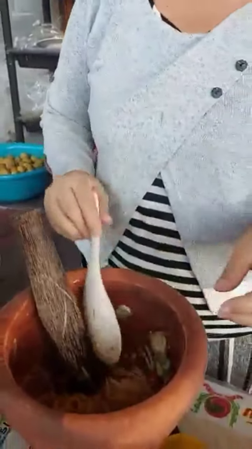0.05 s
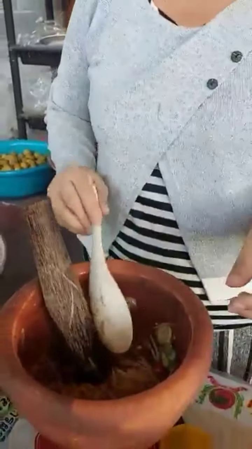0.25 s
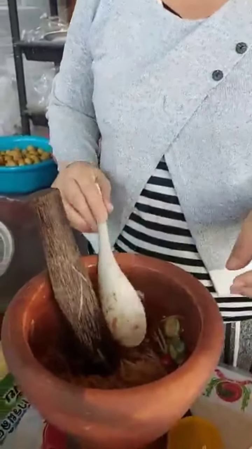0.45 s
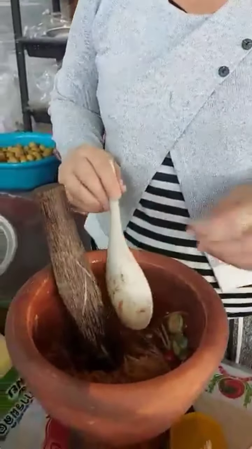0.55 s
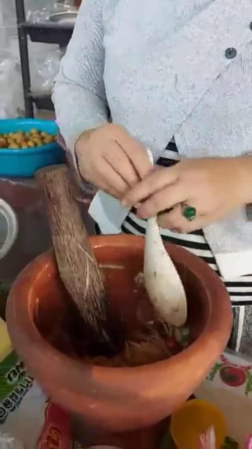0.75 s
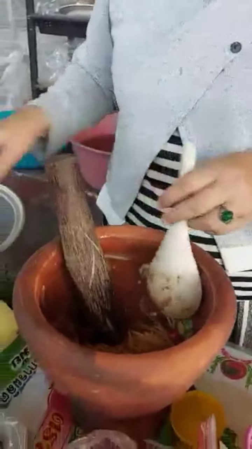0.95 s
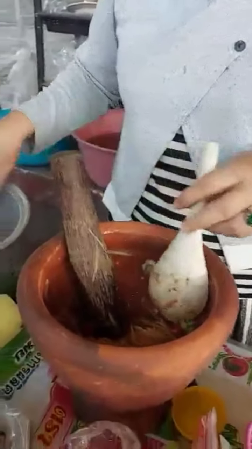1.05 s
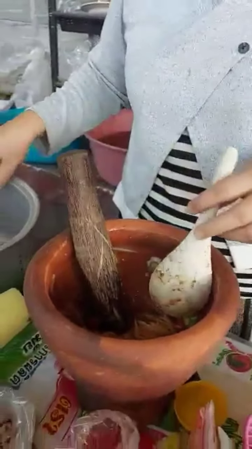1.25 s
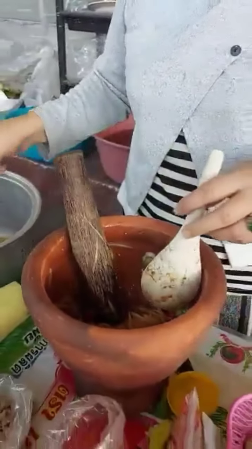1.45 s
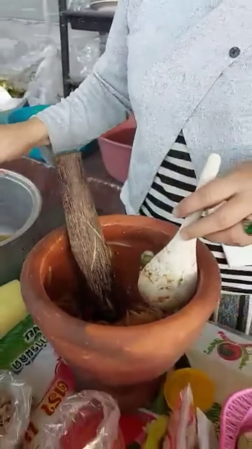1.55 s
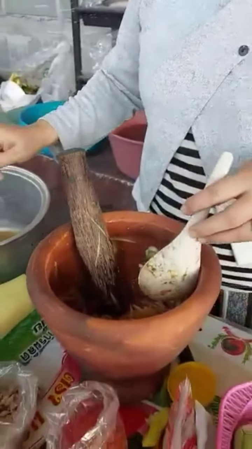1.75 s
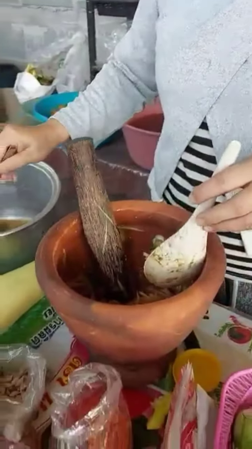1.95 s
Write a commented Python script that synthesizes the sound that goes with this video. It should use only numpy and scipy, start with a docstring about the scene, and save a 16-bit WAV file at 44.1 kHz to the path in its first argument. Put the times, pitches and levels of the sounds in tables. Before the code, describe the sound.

Two bright, ringing clinks sound from a clay mortar at an outdoor stall, heard close up. Then the pestle knocks softly, a spoon scrapes through wet food and a pot clanks lightly, while a distant engine idles.

```python
"""An outdoor stall, with a stereo microphone close to a clay mortar on the table.
A spoon and a wooden pestle strike the clay: two bright clinks ring it and shake the table under it.
A soft knock and a wet scrape through the food follow, things bump on the table, and a metal pot clanks.
Behind them are street wash, a deep rumble, a far engine puffing at idle and a few faint chirps."""
import sys
import numpy as np
from scipy import signal
from scipy.fft import rfft, irfft
from scipy.io import wavfile
from scipy.ndimage import uniform_filter1d

SR = 44100
rng = np.random.default_rng(int(sys.argv[2]) if len(sys.argv) > 2 else 0)


def output_pcm(signal):
    """Save a mono or channel-first signal as 16-bit PCM at the path in sys.argv[1].

    Samples are clipped to [-1, 1] before scaling.
    """
    pcm = np.clip(np.atleast_2d(signal).T, -1, 1) * 32767
    wavfile.write(sys.argv[1], SR, np.round(pcm).astype(np.int16))


N = 88200


def amp(db):
    """Decibels to gain."""
    return 10 ** (np.asarray(db) / 20)


def unit(x):
    """Scales to rms 1."""
    return x / np.sqrt(np.mean(abs(x) ** 2) + 1e-20)


def read(points, hz):
    """Reads a table on a log-frequency axis."""
    f, value = np.transpose(points)
    return np.interp(np.log(hz + 1), np.log(f + 1), value)


def add(mix, start_s, sound):
    """Mixes a stereo sound in at its start time."""
    part = mix[:, max(round(start_s * SR), 0):][:, :sound.shape[1]]
    part += sound[:, :part.shape[1]]


def pan(db):
    """Left and right gains for a level difference."""
    return amp([[db / 2], [-db / 2]])


def decay(t, t60):
    """Dies away by 60 dB in t60 seconds."""
    return np.exp(-np.log(1000) * t / t60)


def noise(n, colour, likeness):
    """Stereo noise of rms 1 with a spectrum colour(Hz) in dB and a left-right likeness up to 1."""
    hz = np.fft.rfftfreq(n, 1 / SR)
    left, other = np.exp(2j * np.pi * rng.random((2, len(hz))))
    right = likeness * left + np.sqrt(1 - likeness ** 2) * other
    return unit(irfft(np.array([left, right]) * amp(colour(hz)), n))


def wander(rate_hz):
    """Random motion of rms 1, mostly slower than rate_hz."""
    hz = np.fft.rfftfreq(N, 1 / SR)
    return unit(irfft(rfft(rng.standard_normal(N)) * np.exp(-(hz / rate_hz) ** 2), N))


def struck(blows, modes, rise_s=.0016):
    """Each blow rings the modes of one object; harder contact favours the high ones."""
    out, t = np.zeros((2, N)), np.arange(SR) / SR
    centre_hz = np.exp(np.mean(np.log([mode[0] for mode in modes])))
    phases = rng.uniform(0, 2 * np.pi, len(modes))
    attack = 1 - np.exp(-(t / rise_s) ** 2)
    for start_s, level_db, tilt_db, ring_factor in blows:
        ring = 0
        for (hz, db, t60, side_db, left_lead), phase in zip(modes, phases):
            wave = np.sin(2 * np.pi * hz * t + phase + np.array([[left_lead], [0]]))
            gain = amp(db + tilt_db * np.log2(hz / centre_hz)) * pan(side_db)
            ring = ring + gain * wave * decay(t, t60 * ring_factor)
        add(out, start_s, amp(level_db) * ring * attack)
    return out


# The short echo of the stall around the microphone. Each row: frequency in Hz, t60 in seconds.
STALL_DECAY = [(150, 0.67), (500, 0.38), (1400, 0.26), (3700, 0.28), (9700, 0.19)]


def stall_reflections(sound, delay_s=.009):
    """The stall throws back sparse reflections whose treble dies first."""
    count, slot = 1400, 20  # one reflection in each slot of 20 samples
    taps = np.zeros((2, count * slot))
    arrivals = np.arange(count) * slot + rng.integers(0, slot, (2, count))
    np.put_along_axis(taps, arrivals, rng.choice([-1., 1.], (2, count)), 1)
    hz, t, spectra = signal.stft(taps, SR, nperseg=256)
    tail = signal.istft(spectra * decay(t, read(STALL_DECAY, hz)[:, None]), SR, nperseg=256)[1]
    out = np.zeros((2, N))
    add(out, delay_s, signal.fftconvolve(sound, tail / np.linalg.norm(tail[0]), axes=1))
    return out


# The street behind the stall. Each row: frequency in Hz, relative level in dB.
WASH_COLOUR = [(20, -7.5), (45, -4.5), (110, -1.5), (160, -11), (260, -10), (400, -17.5), (600, -19.5),
               (850, -23), (1300, -25), (2500, -25), (4500, -28), (7000, -40), (10000, -32), (12500, -32.5),
               (15000, -50)]
# Its bass is central, its treble wide. Each row: frequency in Hz, left-right likeness.
WASH_LIKENESS = [(60, 0.97), (150, 1), (400, .7), (1500, 0.15), (5000, 0.083), (12000, 0.11)]


def street_wash(level_db=-51, patch_db=1):
    """Street noise that swells and sinks slightly in patches of time and frequency."""
    likeness = read(WASH_LIKENESS, np.fft.rfftfreq(N, 1 / SR))
    steady = noise(N, lambda hz: read(WASH_COLOUR, hz), likeness)
    spectra = signal.stft(steady, nperseg=1024, noverlap=768)[2]
    patches = uniform_filter1d(rng.standard_normal(spectra.shape[1:]), size=20, axis=0)
    patches = unit(uniform_filter1d(patches, size=12, axis=1))
    patchy = signal.istft(spectra * amp(patch_db * patches), nperseg=1024, noverlap=768)[1]
    return amp(level_db) * unit(patchy[:, :N])


# The deep rumble of the street. Each row: time in seconds, level in dB.
RUMBLE_LEVELS = [(0.0, -76), (0.03, -37), (0.12, -57.5), (0.22, -31), (0.26, -47), (0.75, -54), (0.81, -37),
                 (0.93, -52), (1.06, -36), (1.1, -43), (1.61, -75), (1.89, -35.5), (1.94, -51.5),
                 (2.0, -32.5)]


def street_rumble(centre_hz=47.6, waver_hz=6):
    """A deep tone of unsteady pitch comes and goes."""
    hz = centre_hz + waver_hz * wander(37)
    level_db = np.interp(np.arange(N) / SR, *np.transpose(RUMBLE_LEVELS))
    return amp(level_db) * np.sin(2 * np.pi * np.cumsum(hz) / SR)


# Resonances of an exhaust, far off. Each row: frequency in Hz, level in dB, t60 in seconds.
EXHAUST_MODES = [(100.4, -34.5, 0.17), (79, -45, 0.16), (240.8, -53.5, .12)]


def idling_engine(firings_per_s=12.88, jitter_s=.0006, spread_db=3, rise_s=.011):
    """A small engine idles: each firing puffs through the exhaust, uneven in time and strength."""
    out, t = np.zeros((2, N)), np.arange(SR // 4) / SR
    ring = sum(amp(db) * np.sin(2 * np.pi * hz * t) * decay(t, t60) for hz, db, t60 in EXHAUST_MODES)
    puff = ring * (1 - np.exp(-(t / rise_s) ** 2))
    for start_s in np.arange(.008, N / SR, 1 / firings_per_s):
        late, strong = rng.standard_normal(2)
        add(out, start_s + jitter_s * late, amp(spread_db * strong) * pan(0) * puff)
    return out


# Chirps in the distance. Each row: start and length in seconds, level in dB,
# then first, middle and last pitch in Hz.
CHIRP_GLIDES = [(.5, .11, -56, 2090, 1970, 1910), (1.56, .075, -56, 4100, 3550, 3080),
                (1.738, .078, -57, 3500, 4050, 3150), (1.61, .03, -52, 1230, 1150, 1100)]


def distant_chirps(roughness=.04, echo_db=-5.5):
    """Faint rough glides arrive with their reflections."""
    out = np.zeros((2, N))
    for start_s, length_s, db, *pitches_hz in CHIRP_GLIDES:
        progress = np.arange(0, 1, 1 / (length_s * SR))
        glide_hz = np.polyval(np.polyfit([0, .5, 1], pitches_hz, 2), progress)
        hz = glide_hz * (1 + roughness * wander(800)[:len(progress)])
        swell = np.sin(np.pi * progress) ** .5
        add(out, start_s, amp(db) * pan(0) * swell * np.sin(2 * np.pi * np.cumsum(hz) / SR))
    return out + amp(echo_db) * stall_reflections(out)


# A clank of the pot near the mortar. Each row: start in seconds, level in dB,
# brightness in dB per octave, ring length factor.
POT_BLOWS = [(1.819, -40, 3.5, 0.99)]
# Modes of its metal. Each row: frequency in Hz, level in dB, t60 in seconds at ring factor 1,
# left over right in dB, phase lead of the left channel in radians.
POT_MODES = [(329, 7.5, 0.59, 0, 0.26), (891, 2.5, 0.41, 1, 1.6), (1780, -4, 0.63, 0, 1.3),
             (2036, -10, 0.7, 0, 1.6), (2190, -23, 0.79, 0, 0.097), (2910, 0, 0.23, 0, 1.7),
             (3110, -7, 0.29, 0.13, 1.5), (3740, -13, 0.38, 0, 1.35), (4580, -6.5, .25, 0.016, 3.4),
             (4860, -13, .25, 0, 1.3), (5200, -11, 0.16, 0.23, 0), (5992, -15.5, 0.35, 0, 2.1)]


def metal_pot():
    """One light blow leaves the metal ringing."""
    return struck(POT_BLOWS, POT_MODES)


# Bumps on the table, close by, and the modes they ring. Rows as for the pot's blows and modes.
BUMP_BLOWS = [(1.2625, -34, 3.5, 0.56), (1.302, -44, -4, 1), (1.357, -38.5, -12.5, 1),
              (1.388, -43.5, -20, 0.72)]
BUMP_RESONANCES = [(265.5, -9.5, 0.046, 0.007, 0.019), (342, -4.5, 0.11, 0, 0.083),
                   (493, -8, 0.053, 0, 0.44), (698, -6, 0.072, 0, 0.092)]


def table_bumps():
    """Things bump on the table: low, dull and quickly damped."""
    return struck(BUMP_BLOWS, BUMP_RESONANCES)


# Strokes through the food and low rubs of handling, close up. Each row: start and length in seconds,
# level in dB, centre in Hz, width to either side in octaves.
SCRAPE_STROKES = [(0.017, 0.067, -49.5, 5960, 3.6), (0.166, 0.076, -45, 2480, 1.6),
                  (0.244, 0.041, -43.5, 4500, 0.88), (0.577, 0.23, -55.5, 4530, 0.22),
                  (.72, 0.17, -50.5, 6830, 2.2), (1.007, 0.11, -44, 2270, 0.75),
                  (1.009, 0.11, -51, 9800, 0.39), (1.803, 0.077, -44, 4000, 0.81),
                  (1.86, 0.12, -46, 1390, 1.1), (1.903, 0.098, -53.5, 4100, 0.2),
                  (1.929, 0.12, -49, 250, 1.22), (.01, .2, -52.5, 230, 1.27)]


def spoon_scrapes(grain_db=2, peak_at=.32):
    """The spoon slides through wet food: each stroke or rub is a grainy swell of noise."""
    out = np.zeros((2, N))
    for start_s, length_s, db, centre_hz, octaves in SCRAPE_STROKES:
        def band_db(hz):
            return -10 * np.log10(1 + (np.log2((hz + 1) / centre_hz) / octaves) ** 4)
        progress = np.arange(0, 1, 1 / (length_s * SR))
        hiss = noise(SR // 2, band_db, likeness=.14)[:, :len(progress)]
        grains = unit(amp(grain_db * wander(400)))[:len(progress)]
        swell = np.interp(progress, [0, peak_at, 1], [0, 1, 0])
        add(out, start_s, amp(db) * hiss * grains * swell)
    return out


# Soft knocks of the pestle, close up, and the modes of its wood. Rows as for the pot's blows and modes.
PESTLE_BLOWS = [(.9165, -27, -3, 0.42), (0.19, -40, 1, 0.67)]
PESTLE_MODES = [(798, -9.5, .04, 1, 0.093), (1150, -7, 0.031, 0, .5), (1480, -12.5, 0.05, 1, 0.32),
                (1728, 5, 0.052, 6, 1)]


def wooden_pestle():
    """The wood rings for only a moment after each knock."""
    return struck(PESTLE_BLOWS, PESTLE_MODES)


# Hard contacts of spoon and pestle, close up. Each row: start in seconds, level in dB,
# brightness in dB per octave, t60 in seconds, left over right in dB.
CONTACTS = [(0.1466, -25, -6, 0.043, 0), (0.159, -35, -1, 0.099, 0), (0.181, -30.5, -8, 0.074, 0.5),
            (0.2158, -9, -4.5, 0.027, 3), (0.3953, -21, 14, 0.02, 2), (0.3975, -9, -2.5, 0.017, 2.5),
            (.4252, -5.5, -0.5, 0.015, 0), (0.553, -46, 7, .05, 2), (.917, -36.5, -9, 0.015, 12),
            (0.96, -42.5, 2.5, 0.017, 3), (0.98, -39, -7, .02, 0), (1.207, -46, 12.5, 0.052, 4.5),
            (1.2625, -42.5, 6.5, 0.053, -0.5), (1.358, -52.5, 10, 0.15, 1.5), (1.818, -37, 8, 0.07, 6)]
# Their shared spectrum. Each row: frequency in Hz, relative level in dB.
CONTACT_COLOUR = [(100, -36), (400, -15.5), (700, -10), (1050, 7), (1400, -13.5), (1800, 2), (2700, 7),
                  (3400, -3), (4200, 4), (5400, -3.5), (7500, -14.5), (10000, -6.5), (12500, -20.5),
                  (15500, -25.5)]


def contact_clacks(rise_s=.00033):
    """Each hard contact is a short burst of dense, heavily damped ringing."""
    out, t = np.zeros((2, N)), np.arange(SR // 10) / SR
    attack = np.minimum(t / rise_s, 1)
    for start_s, db, tilt_db, t60, side_db in CONTACTS:
        def colour_db(hz):
            return read(CONTACT_COLOUR, hz) + tilt_db * np.log2(hz + 100)
        burst = noise(len(t), colour_db, likeness=.25)
        add(out, start_s, amp(db) * pan(side_db) * burst * attack * decay(t, t60))
    return out


# Low modes of the table under the mortar. Rows as for the pot's modes.
TABLE_MODES = [(156.2, -20.5, 0.16, 1, 0.0014), (178.8, -34.5, 0.35, 2.5, 0.0076),
               (215, -33, 0.24, 0.5, 0.0045), (306.3, -29, 0.21, -2, 0.0068),
               (502, -29.5, 0.24, -7.5, 0.00081)]


def table_thuds(blows):
    """Blows on the mortar pass into the table; only their timing and strength carry over."""
    return struck([(start_s, db, 0, 1) for start_s, db, _, _ in blows], TABLE_MODES)


# Blows on the mortar, right by the microphone. Each row: start in seconds, level in dB,
# brightness in dB per octave, ring length factor.
MORTAR_BLOWS = [(.183, -40.5, -7, .4), (0.2159, -12, 0, 0.72), (0.4257, -11, 6, 0.75),
                (.916, -43.5, -9.5, 1.52), (.959, -71, 0, 0.34)]
LOW_RING_HZ, HIGH_RING_HZ = 901, 2347  # the two modes that ring longest
# Modes of its clay. Rows as for the pot's modes.
MORTAR_MODES = [(560, -27.5, .09, -2.5, -0.38), (LOW_RING_HZ, -7, 0.38, 0.67, -0.71),
                (1027.5, -12.5, .04, -1.5, 1.2), (1063.5, -5.5, .09, -4, 0), (1115, -11, .1, 4, 0.3),
                (1757, -7, 0.127, -1.5, 1.24), (1994, -24.5, .16, 1.5, -1), (2266.5, -16.5, .12, 2, -6),
                (HIGH_RING_HZ, 2.9, 0.22, -1, 0), (2302, -2, .05, -5.5, 2), (2563, -2.5, .08, 5.5, 0.9),
                (2888.5, -6.5, .07, -13.5, -0.5), (2997.5, -22.5, .14, -5.5, 1.7),
                (3764, -12.5, .09, -1.5, 1.4), (4000.5, -26.5, .2, 0, 1.5), (5029.5, -21.5, .13, 7.5, 2.5),
                (5421.5, -23.5, 0.15, 3, 3), (6301.5, -39, .16, 1, 1), (8530, -42.5, .16, 2, 1)]


def clay_mortar():
    """Two hard blows ring the clay brightly; the lighter touches barely sound it."""
    return struck(MORTAR_BLOWS, MORTAR_MODES)


def scene(ring_echo_db=-15.5, clack_echo_db=-12):
    """Close rings, clacks and scrapes at the stall, over the quiet street."""
    rings = clay_mortar() + wooden_pestle() + table_bumps() + metal_pot()
    clacks = contact_clacks()
    echo = stall_reflections(amp(ring_echo_db) * rings + amp(clack_echo_db) * clacks)
    close = rings + clacks + table_thuds(MORTAR_BLOWS) + spoon_scrapes()
    background = distant_chirps() + street_wash() + street_rumble() + idling_engine()
    return close + echo + background


# Treble loss of the microphone. Each row: frequency in Hz, gain in dB.
MICROPHONE_TREBLE = [(12000, 0), (12800, 0), (13400, -16), (16000, -24)]


def record(dry):
    """The microphone loses deep bass and top treble; full-scale clipping, then the band limit."""
    low_cut_hz, band_limit_hz = 46, 15700
    hz = np.fft.rfftfreq(N, 1 / SR)
    low_cut = 1 / np.sqrt(1 + (low_cut_hz / (hz + 1)) ** 12)
    picked_up = irfft(rfft(dry) * low_cut * amp(read(MICROPHONE_TREBLE, hz)), N)
    band_limit = signal.firwin(511, band_limit_hz, window=("kaiser", 9), fs=SR)
    return signal.oaconvolve(np.clip(picked_up, -1, 1), band_limit[None], "same")


dry = scene()
out = record(dry)
output_pcm(out)
```